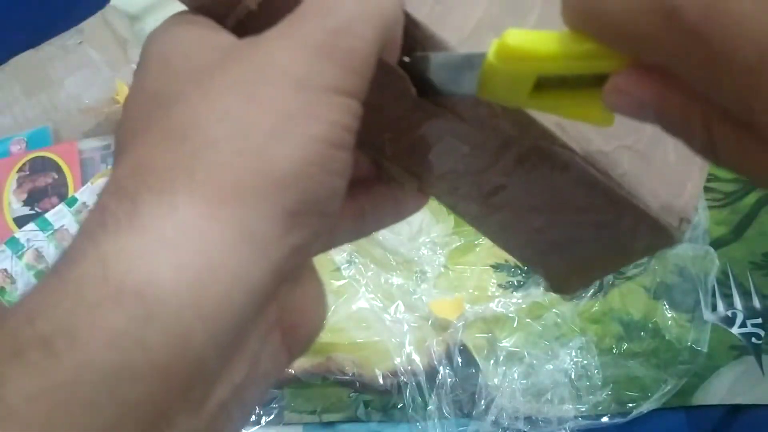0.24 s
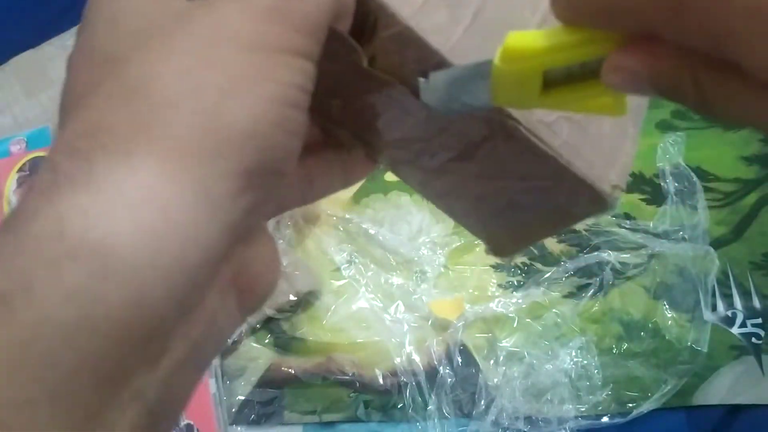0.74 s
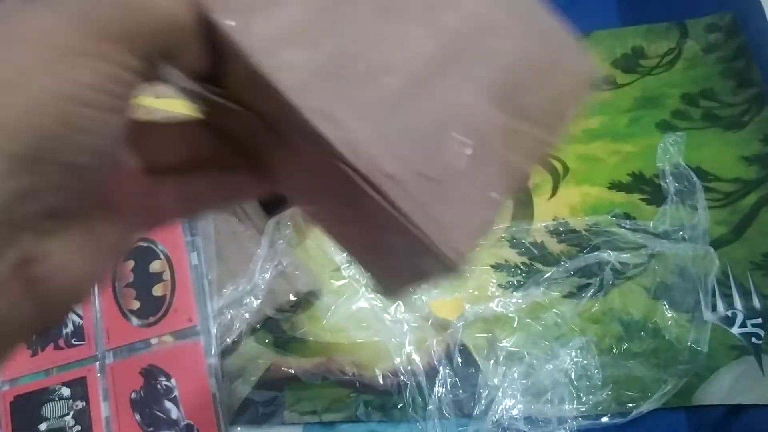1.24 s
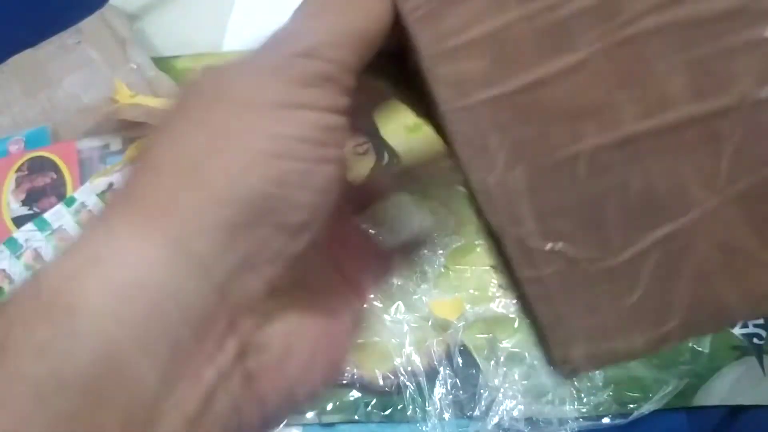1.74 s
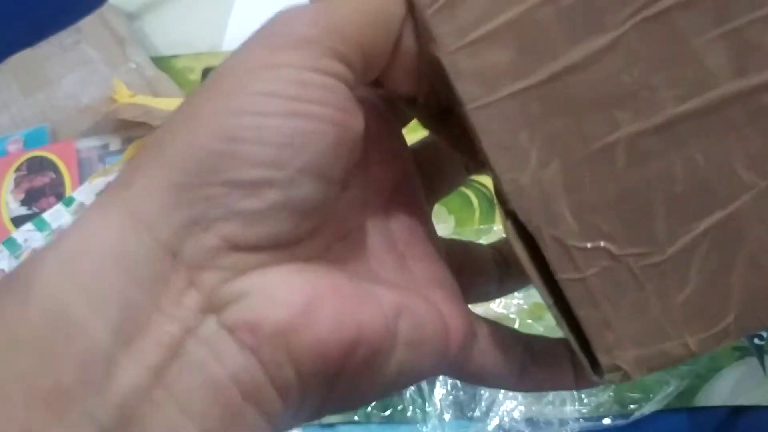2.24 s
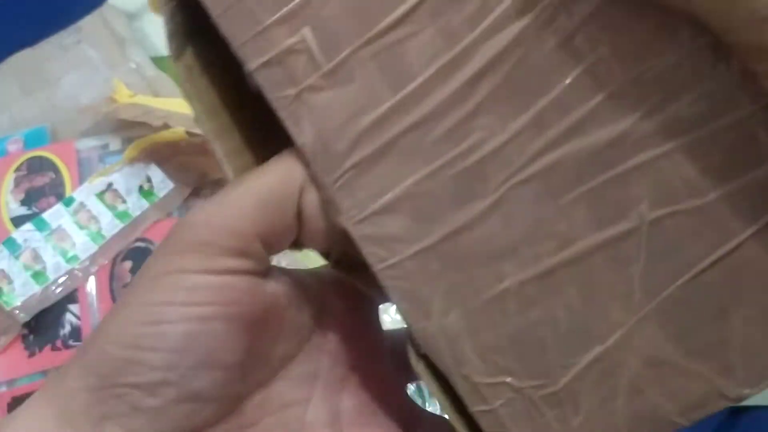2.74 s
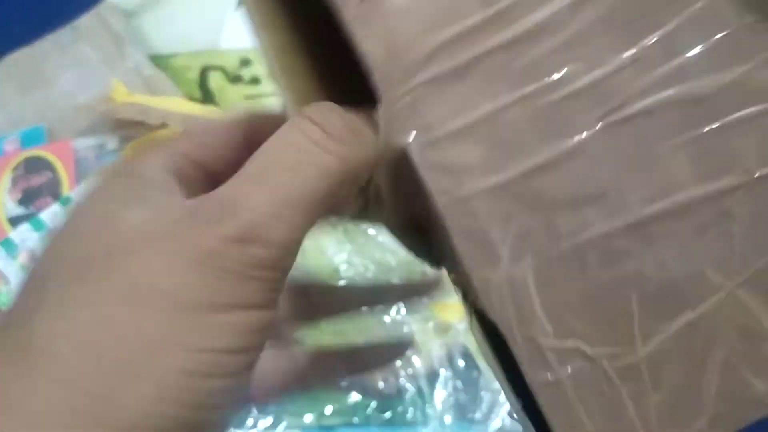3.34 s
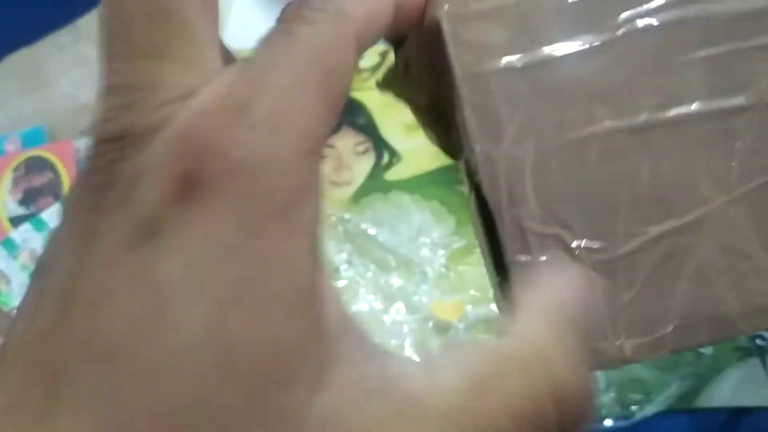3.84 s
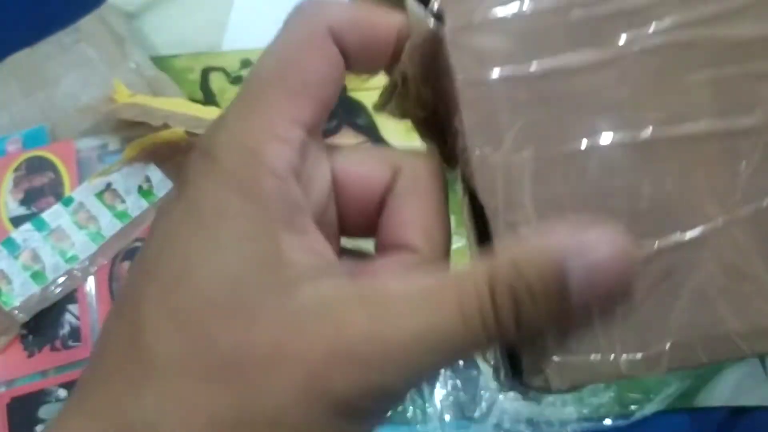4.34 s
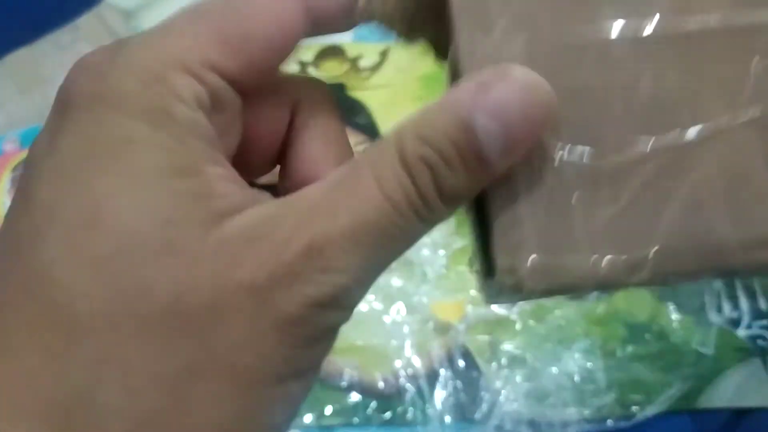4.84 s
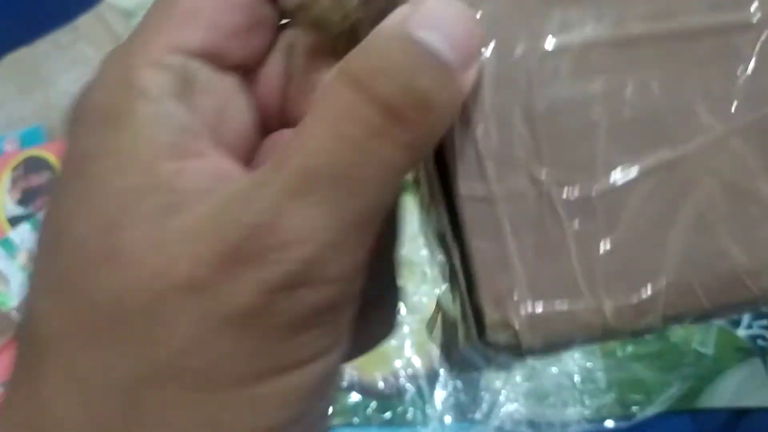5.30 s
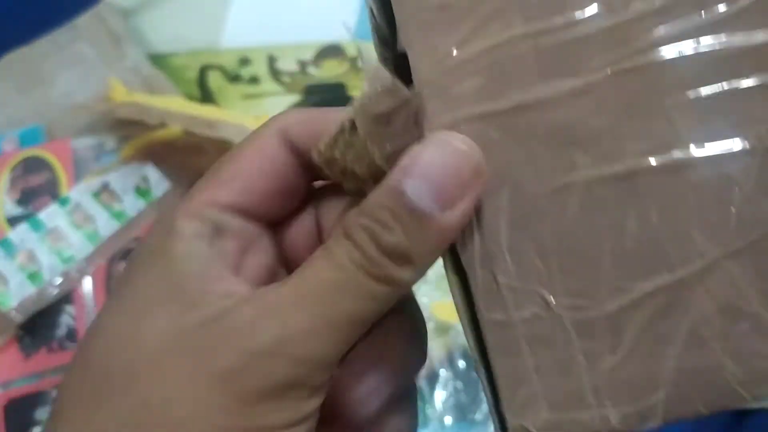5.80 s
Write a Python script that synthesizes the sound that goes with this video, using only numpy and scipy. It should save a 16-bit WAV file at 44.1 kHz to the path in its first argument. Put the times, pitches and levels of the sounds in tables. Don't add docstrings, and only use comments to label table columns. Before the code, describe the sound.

Indoors, with a soft low fan hum and light hiss, a small hollow box is worked on right beside the microphone. Gritty blade strokes crackle first, then fingers thud, rub and tap. Two bursts of bright tape snapping follow, separated by quiet handling; later a big sharp tear jolts the box, and thin creasing ticks, a short peel and a soft low set-down bump finish it.

```python
import sys
import numpy as np
from scipy import signal
from scipy.io import wavfile
from scipy.ndimage import uniform_filter1d

SR = 44100
rng = np.random.default_rng(int(sys.argv[2]) if len(sys.argv) > 2 else 0)


def to_wav(sig):
    pcm = np.clip(np.atleast_2d(sig), -1, 1) * 32767
    pcm = np.round(pcm).astype(np.int16)
    wavfile.write(sys.argv[1], SR, pcm.T)


def level_to_linear(level):
    exponent = np.asarray(level, float) / 20
    return 10 ** exponent


N = 267475

# frequency in Hz, density in dB per Hz.
AIR_SPECTRUM = [(15, -79), (25, 3.5), (90, -1), (238, -13), (358, -15.5), (457, -11), (524, -16.5),
                (726, -14), (902, -21.5), (1980, -25.5), (7300, -26.5), (15800, -33.5), (16200, -60)]
# frequency in Hz, left-right correlation (0 to 1).
AIR_LIKENESS = [(60, 0.51), (300, 0.87), (900, 0.21), (3000, 0.16), (15000, 0.092)]
# time in seconds, pitch in Hz, level in dB.
FAN_HUM = [(0.0, 97, -61), (0.91, 95.4, -63.5), (1.06, 94.9, -65.5), (1.23, 88, -60.5), (1.38, 94, -65),
           (1.6, 93.4, -64.5), (1.75, 92.5, -56.5), (2.15, 92, -54.5), (2.65, 91, -66), (3.11, 89.4, -62),
           (3.2, 89.6, -54), (3.7, 89.1, -62), (4.14, 93.5, -63), (4.85, 93.5, -57.5), (5.35, 93, -54),
           (5.6, 92, -58.5), (5.89, 91, -52), (6.07, 92, -63)]
# frequency in Hz, time to fall 60 dB in seconds.
ROOM_DECAY = [(100, 0.19), (1000, 0.3), (5000, 0.3), (15000, 0.17)]
# time in seconds, left over right in dB.
HAND_PLACE = [(0.0, 3), (0.27, 0.5), (5.47, -1), (6.07, -1)]
# frequency in Hz, bandwidth in Hz, level in dB.
BOX_MODES = [(190, 105, -5.5), (294, 180, -1.5), (430, 129, -2.5), (616, 142, -0.5), (826, 154, -0.5),
             (1193, 206, 0.5), (1211, 84, -6), (1484, 170, -7), (2080, 1500, -23)]
# start in seconds, peak in dB, pitch in Hz.
BUMPS = [
    (0.364, -40, 96),
    (0.536, -44, 110),
    (0.907, -40, 83.4),
    (1.649, -25, 118),
    (1.887, -44, 112),
    (4.663, -45, 94),
    (5.961, -33.5, 59.2),
]
# peak time in seconds, peak in dB, pitch in Hz.
FINGER_TAPS = [(0.517, -44, 840), (1.2415, -42.5, 280), (1.5418, -36, 364), (1.665, -29, 173),
               (1.801, -37.5, 594), (2.354, -42, 523), (2.8149, -37.5, 1290), (2.824, -39, 810),
               (2.9177, -41, 800), (3.027, -45, 960), (3.4712, -36, 512), (3.7407, -36.5, 335),
               (3.8462, -45, 536), (3.942, -42, 526), (4.151, -38, 308), (4.179, -35, 322),
               (4.204, -42, 300), (4.3516, -32.5, 430), (4.8372, -43.5, 775), (4.9278, -43, 744),
               (5.1022, -43.5, 760), (5.2246, -48, 730), (5.387, -42.5, 756), (5.654, -42.5, 290),
               (5.9489, -56, 548), (5.959, -51, 990)]
# peak time in seconds, peak in dB, pitch in Hz, push length in ms.
BOX_KNOCKS = [(0.1466, -44, 1130, 2.8), (0.1626, -44, 1560, 0.88), (0.333, -50, 1320, 2),
              (0.3565, -33, 820, 2.54), (0.5356, -34.5, 1219, 4.16), (0.7023, -56, 800, 5.5),
              (0.8905, -24.5, 1190, 2.1), (0.9, -24, 450, 2.95), (0.919, -28, 771.3, 2.2),
              (0.928, -35.5, 660, 1.2), (1.5257, -43, 700, 3.1), (1.657, -19.5, 190, 2.1),
              (1.884, -28.5, 190, 2.2), (2.1464, -43, 1270, 2.9), (2.2818, -27, 763, 2.07),
              (2.3043, -36.5, 760, 4.5), (2.7015, -49, 738, 2.5), (2.8719, -32.5, 764.2, 3.76),
              (3.0977, -43, 440, 1.4), (3.643, -29, 430, 1.94), (3.8732, -34, 500, 1.5),
              (4.1143, -33, 382, 0.9), (4.6116, -48.5, 1360, 2.2), (4.6625, -16.5, 1090, 1.44),
              (4.6634, -20, 630, 1.89), (4.6668, -11, 343, 1.96), (4.6779, -45, 332, 6.7),
              (5.5119, -49.5, 1190, 0.83), (5.84, -45.5, 420, 1.5), (5.9712, -58, 640, 4.3),
              (6.0089, -33.5, 1010, 1.2)]
# frequency in Hz, density in dB per Hz.
TAPE_SPECTRUM = [(2500, -35.5), (3400, -23.5), (4200, -5), (5000, -7), (6500, -3), (8000, -4), (9500, -2),
                 (11500, -3), (14000, -10), (15800, -6), (16300, -51)]
# frequency in Hz, density in dB per Hz.
SCRATCH_SPECTRUM = [(800, -17.5), (1500, -6), (2100, -5.5), (2900, -7), (4200, -5), (5500, -8.5),
                    (8000, -20)]
# frequency in Hz, density in dB per Hz.
SNAP_SPECTRUM = [(2500, -18.5), (4500, -0.5), (8000, -3), (12000, -2), (16000, -12.5), (18000, -28.5)]
# peak time in seconds, tape crackle in dB, build in seconds,
# fade in seconds, brightness of tape over box in dB.
SAW_STROKES = [
    (0.01, -62, 0.086, 0.23, 2.5),
    (0.146, -40, 0.0048, 0.024, 24),
    (0.239, -41, 0.032, 0.04, 8.5),
    (0.358, -41, 0.033, 0.063, 6.5),
    (0.54, -33.5, 0.031, 0.019, 6),
    (0.7, -38.5, 0.072, 0.051, 8),
    (0.89, -39.5, 0.01, 0.045, -12),
    (0.94, -70, .005, 0.14, -5),
]
# peak time in seconds, tape crackle in dB, build in seconds,
# fade in seconds, brightness of tape over box in dB.
HAND_SQUEEZES = [(1.229, -62, 0.0079, 0.069, -10.5), (1.371, -58.5, 0.098, 0.099, -0.5),
                 (1.527, -50, 0.008, 0.018, -23), (1.802, -49.5, 0.091, 0.051, -6),
                 (1.866, -60, 0.0073, 0.14, -7), (2.04, -47.5, 0.098, .01, -1.5),
                 (2.79, -60.5, 0.6, 0.041, -12), (1.73, -62, 0.083, 0.2, -3),
                 (3.36, -45, 0.091, 0.092, -1.5), (3.452, -53.5, 0.17, 0.19, -5.5),
                 (3.843, -59.5, 0.0058, 0.042, -17.5), (3.932, -60, 0.0064, 0.13, -14),
                 (4.184, -51, 0.028, 0.055, -10.5), (4.359, -53, 0.13, 0.18, -7),
                 (4.656, -42.5, 0.17, 0.11, 6.5), (4.92, -50.5, 0.056, 0.055, -8),
                 (5.122, -58.5, 0.13, 0.01, -12.5), (5.212, -55, 0.0075, 0.084, -2.5),
                 (5.403, -41, 0.11, 0.012, 3), (5.63, -45, 0.095, 0.048, 3), (5.83, -63, 0.16, 0.26, 5),
                 (5.956, -39.5, 0.041, 0.075, -5), (3.26, -56, 0.21, 0.049, -4)]
# start in seconds, length in seconds, tape crackle in dB,
# swell from start to end in dB, brightness of tape over box in dB.
STEADY_PULLS = [(0.68, 0.051, -39.5, -3.5, 1), (0.87, 0.048, -34.5, 7.5, -0.5), (1.552, 0.15, -57, -9, 4.5),
                (2.042, 0.14, -46, -8, 6), (2.145, 0.13, -39.5, 8, 10.5), (2.277, 0.089, -34.5, -5, 8),
                (2.367, 0.12, -59, 4, -2), (2.506, 0.1, -55.5, -7.5, -5), (2.803, 0.141, -35.5, 2.5, 13),
                (3.634, 0.1124, -53.5, 14.5, -4), (2.987, 0.12, -57.5, -6, -11.5),
                (4.112, 0.073, -66.5, 5, -21.5), (4.789, 0.16, -56, -2.5, -6.5), (5.396, 0.25, -48, 6, 15),
                (5, .05, -58, 7, 7), (4.576, 0.017, -43.5, -3, 7), (4.608, 0.043, -41.5, -13, 12),
                (4.13, 0.093, -61.5, 2, -14.5), (4.2, 0.037, -49, -2, 10)]
# peak time in seconds, peak in dB, burst length in ms.
BLADE_CUTS = [(0.0527, -44, 0.57), (0.071, -43.5, 0.7), (0.126, -45, 1.6), (0.147, -24, 0.15),
              (0.163, -32, 0.53), (0.214, -31.5, 0.58), (0.218, -30, 0.76), (0.2374, -31, 0.99),
              (0.255, -36, 1.2), (0.271, -39, 1.1), (0.3332, -35.5, 0.74), (0.3552, -19.5, 1.78),
              (0.4996, -39, 0.53), (0.5147, -25.5, 1), (0.5352, -20.5, 3.5), (.8456, -50, .7),
              (0.8694, -42, 0.65), (0.8868, -22, 1.3), (0.891, -19, 1.13), (0.918, -29, 2.3),
              (0.9267, -18.5, 0.99), (1.066, -54, 0.82), (3.845, -50, 0.34), (6.008, -39, 0.51)]
# peak time in seconds, peak in dB, pitch
# in Hz.
EARLY_TICKS = [(0.0603, -45, 11400), (0.0785, -46, 10400), (0.1112, -43, 10000), (0.121, -41, 10400),
               (0.143, -39, 10200), (0.151, -15.5, 10200), (0.159, -29, 10500), (0.2318, -28, 10800),
               (0.343, -41, 8100), (0.4779, -47, 8100), (0.6583, -40, 10400), (0.7283, -22.5, 7200),
               (1.1322, -46, 7460), (1.2297, -55, 5872), (1.2389, -35.5, 4330), (1.2993, -51, 6500),
               (1.332, -45, 6260), (1.363, -48, 5900), (1.3765, -33, 5940), (1.387, -44, 6150),
               (1.401, -41, 6860), (1.4229, -49, 6900), (1.4489, -53, 8200), (1.4935, -48, 6900),
               (1.5304, -37, 5600), (1.5772, -36, 7100), (1.5835, -37, 7340), (1.601, -36, 7140),
               (1.6127, -31, 7740), (1.623, -45, 9300), (1.627, -38, 7400), (1.654, -40, 7860),
               (1.6683, -43, 7400), (1.6808, -41, 7000), (1.771, -45, 6700), (2.0009, -40, 6900),
               (2.0078, -38, 9800), (2.0298, -33, 9200), (2.0475, -29, 9300), (2.105, -27.5, 9100),
               (2.1187, -24.5, 8100), (2.1317, -27, 9200), (2.1505, -26, 8550), (2.1752, -25, 8700),
               (2.18, -21, 9300), (2.1876, -27, 8900), (2.1989, -30, 11200), (2.219, -22.5, 8300),
               (2.3398, -26, 8100), (2.4653, -44, 9432), (2.7952, -34, 9100), (2.8017, -37, 7900),
               (2.8256, -19, 9600), (2.894, -20, 8300), (2.918, -33, 7750), (2.996, -38, 9000),
               (3.0208, -49, 9800), (3.1519, -46, 9850)]
# peak time in seconds, peak in dB, pitch in Hz.
LATE_TICKS = [(3.1841, -52, 8200), (3.2386, -41, 9300), (3.2549, -49, 8200), (3.28, -49, 8000),
              (3.6089, -47, 6790), (3.6348, -49, 5560), (3.6413, -46, 7500), (3.6808, -36, 6770),
              (3.7224, -31, 6300), (3.8724, -40.5, 5620), (4.08, -51, 7700), (4.2935, -33, 11300),
              (4.3168, -31, 9000), (4.3253, -35, 9700), (4.3344, -32, 9700), (4.3542, -29, 12100),
              (4.4026, -34, 11500), (4.4326, -41, 7800), (4.4426, -39, 12500), (4.4598, -41, 10000),
              (4.4961, -42, 9700), (4.5128, -41, 9000), (4.519, -34, 11000), (4.537, -35, 8400),
              (4.5572, -35, 9900), (4.5618, -40, 9400), (4.5787, -24, 11200), (4.6334, -30, 10200),
              (4.813, -39, 8800), (4.8353, -33, 8400), (5.0695, -30, 9800), (5.0923, -37, 7400),
              (5.1174, -30, 8650), (5.1239, -43, 9100), (5.1281, -40, 7800), (5.212, -50, 7700),
              (5.2187, -45, 7800), (5.2252, -37, 7800), (5.234, -35, 11200), (5.251, -38, 7800),
              (5.301, -52, 10200), (5.3198, -37, 8200), (5.3556, -24.5, 8560), (5.4162, -32, 8500),
              (5.4329, -34, 9100), (5.5061, -32.5, 8450), (5.541, -38, 8540), (5.5617, -33.5, 8250),
              (5.5746, -30, 8200), (5.5878, -36, 8360), (5.5999, -26.5, 8200), (5.632, -35, 8700),
              (5.7095, -33.5, 9100), (5.7923, -47, 9730), (5.839, -42, 9100), (5.8511, -47, 9400),
              (5.9556, -26.5, 6000), (5.9848, -31, 5600)]
# peak time in seconds, peak in dB, scratch relative to the snap in dB,
# burst length in ms, pitch in Hz.
TAPE_SNAPS = [(1.5256, -42.5, 12, 0.4, 5600), (1.594, -28, -7, 0.44, 6870),
              (2.0436, -19, -23.5, 0.41, 9500), (2.0513, -30, -10, .8, 9000), (2.06, -18, -17, 0.56, 9500),
              (2.0755, -21, -13, 0.43, 10000), (2.0816, -23.5, -17, 1.2, 9100),
              (2.1461, -18.5, -13, 0.31, 10500), (2.2808, -23, -3, 1.94, 9950),
              (2.3045, -10, -15, 0.25, 9300), (2.7001, -37, 2, 0.41, 7000), (2.807, -42, -18, 2.1, 9000),
              (2.8139, -18.5, -20, 0.54, 9000), (2.8422, -18, -21, 0.96, 9200),
              (2.8653, -16, -13, 0.5, 8500), (2.8709, -16, -14, 2.68, 8070),
              (2.8996, -20.5, -17, 0.46, 9030), (2.9891, -35.5, -7, 1.13, 8000),
              (4.3482, -14, -18, 0.46, 8600), (4.392, -35, -17, 1.1, 9800), (4.4843, -33, -7.5, 0.91, 9300),
              (4.6083, -24, -17.5, 1.1, 10000), (4.6513, -23.5, -23, 2.6, 9000), (4.66, -18, -24, 3, 8300),
              (4.6624, -7, -14, 1.2, 8000), (4.6638, -12, -4, 0.65, 10300), (5.337, -36.5, -10, 0.7, 8550),
              (5.397, -26.5, -15, 0.68, 8990), (5.511, -27, -9, 0.33, 6550),
              (5.5951, -23.5, -13.5, .6, 8500)]

BLADE_SCRATCH_DB, HAND_SCRATCH_DB, PEEL_SCRATCH_DB = 1, -4, -7


def evened(x):
    return x / np.sqrt(np.mean(x ** 2) + 1e-20)


def read(points, hz):
    f, value = np.transpose(points)
    return np.interp(np.log(hz + 1), np.log(f + 1), value)


def curve(rows, axis):
    rows = np.array(rows)
    return np.interp(np.arange(N) / SR, rows[:, 0], rows[:, axis])


def add(mix, s, sound):
    part = mix[..., max(round(s * SR), 0):][..., :sound.shape[-1]]
    part += sound[..., :part.shape[-1]]


def colour(points):
    hz = abs(np.fft.fftfreq(4096, 1 / SR))
    log_gain = np.log(level_to_linear(np.maximum(read(points, hz), -80)))
    taps = np.fft.ifft(np.exp(log_gain - 1j * signal.hilbert(log_gain).imag)).real[:1024]
    return taps / np.linalg.norm(taps)


def swelling(t, rise):
    return t / rise * np.exp(1 - t / rise)


def panned(pan_db):
    return level_to_linear(np.array([pan_db / 2, -pan_db / 2]))


def air():
    frames, hz = N // 512 + 5, np.fft.rfftfreq(2048, 1 / SR)
    a, b, c, d, patches = rng.standard_normal((frames, 1025, 5)).T
    patches = evened(uniform_filter1d(uniform_filter1d(patches, 20, 0), 8, 1))
    same = read(AIR_LIKENESS, hz)[:, None]
    left = a + 1j * b
    right = same * left + np.sqrt(1 - same ** 2) * (c + 1j * d)
    z = np.array([left, right]) * level_to_linear(read(AIR_SPECTRUM, hz)[:, None] + 2.06 * patches)
    return level_to_linear(-59.5) * evened(signal.istft(z, nperseg=2048, noverlap=1536)[1][:, :N])


def hum():
    waver = evened(uniform_filter1d(uniform_filter1d(rng.standard_normal(N), 2600), 2600))
    phase = 2 * np.pi * np.cumsum(curve(FAN_HUM, axis=1)) / SR
    return np.sqrt(2) * level_to_linear(curve(FAN_HUM, axis=2) + 2.4 * waver) * np.sin(phase)


def room_tail():
    taps = rng.choice([-1., 1.], (2, SR // 2)) * (rng.random((2, SR // 2)) < .05)
    taps[:, :300] = 0
    hz, t, z = signal.stft(taps, SR, nperseg=256)
    tail = signal.istft(z * level_to_linear(-60 * t / read(ROOM_DECAY, hz)[:, None]), SR, nperseg=256)[1]
    return tail / np.linalg.norm(tail[0])


def near_paths(count):
    near = rng.standard_normal((count, 2, 300)) * (rng.random((count, 2, 300)) < .4)
    near *= level_to_linear(-60 * np.arange(300) / SR / .008)
    near = signal.lfilter(*signal.butter(2, 2300, "high", fs=SR), near)
    paths = level_to_linear(-1.5) * near / np.linalg.norm(near, axis=2)[..., None]
    lag = 6
    paths[np.arange(count), 0, lag + np.arange(count) % 2] += 1
    paths[:, 1, 0] += 1
    return paths


def space(x, count=14):
    out = level_to_linear(-12) * signal.fftconvolve(x[None], room_tail(), axes=1)[:, :N]
    spot = np.repeat(rng.integers(0, count, N // 500 + 1), 500)[:N]
    for k, path in enumerate(near_paths(count)):
        share = np.sqrt(abs(uniform_filter1d(1. * (spot == k), 200)))
        out += signal.oaconvolve((x * share)[None], path, axes=1)[:, :N]
    return out * panned(curve(HAND_PLACE, axis=1))


def box_ring():
    t = np.arange(1500) / SR
    ring = np.zeros(1500)
    for k, (hz, width, db) in enumerate(BOX_MODES):
        ring += level_to_linear(db) * (-1) ** k * np.exp(-np.pi * width * t) * np.sin(2 * np.pi * hz * t)
    return ring / np.linalg.norm(ring)


def bumps():
    out, t = np.zeros(N), np.arange(2000) / SR
    for s, db, hz in BUMPS:
        add(out, s, level_to_linear(db - 2.0) * swelling(t, 0.45 / hz) * np.sin(2 * np.pi * hz * t))
    return out


def knocks():
    out, t, ring = np.zeros(N), np.arange(2000) / SR, box_ring()
    rows = BOX_KNOCKS + [(*row, 3.49) for row in FINGER_TAPS]
    for (s, db, hz, ms), noise in zip(rows, rng.standard_normal((len(rows), 2000))):
        rise = ms * 0.884 / 1000
        push = swelling(t, rise) ** 2.87
        body = signal.fftconvolve(noise * push, ring)[:2000]
        hardness = np.clip(hz / 700, 0, 1) ** 2
        flex = push * np.cos(2 * np.pi * hz * (t - rise))
        flex -= push * flex.sum() / push.sum()
        hit = flex + 1.01 * hardness * body / abs(body).max()
        add(out, s - rise, level_to_linear(db - 2.0) * hit)
    return out


def grains(per_s, spread_db, clump_db, clump_ms):
    size = level_to_linear(spread_db * np.minimum(rng.exponential(1, N), 5)) * rng.choice([-1., 1.], N)
    width = max(int(clump_ms * SR / 1000), 2)
    clumps = evened(uniform_filter1d(uniform_filter1d(rng.standard_normal(N), width), width))
    slips = size * (rng.random(N) < per_s / SR) * level_to_linear(clump_db * clumps)
    return slips / np.sqrt(uniform_filter1d(slips ** 2, 3000) + 1e-9)


def layers(db, bright_db, scratch_db):
    return level_to_linear(db + np.array([[0], [scratch_db - 0.45 * bright_db], [-bright_db]])) ** 2


def strain():
    t = np.arange(0, N + 32, 32) / SR
    power = layers(-78 + 0 * t, -4.5, HAND_SCRATCH_DB)
    for rows, scratch_db in ((SAW_STROKES, BLADE_SCRATCH_DB), (HAND_SQUEEZES, HAND_SCRATCH_DB)):
        for s, db, build, fade, bright_db in rows:
            effort_db = db - 20 * np.maximum((s - t) / build, (t - s) / fade)
            power = power + layers(effort_db, bright_db, scratch_db)
    edge_s = 0.0019
    for s, length, db, swell_db, bright_db in STEADY_PULLS:
        scratch_db = BLADE_SCRATCH_DB if s < 1 else PEEL_SCRATCH_DB
        outside = np.maximum(np.maximum(s - t, t - s - length), 0)
        swell = swell_db * ((t - s) / length - .5).clip(-1, 1)
        power = power + layers(db + swell - 20 * outside / edge_s, bright_db, scratch_db)
    return [np.interp(np.arange(N) / SR, t, np.sqrt(p)) for p in power]


def tearing():
    tape = grains(8000, 1.0, 0.9, 1.4)
    paper = grains(5000, 0.77, 2.4, 2.0) + 0.78 * tape
    wall = grains(2500, 0.87, 3.8, 16.5) + 0.34 * paper
    crackle, scratch, rustle = strain()
    out = level_to_linear(-3.5) * signal.oaconvolve(tape * crackle, colour(TAPE_SPECTRUM))[:N]
    out += level_to_linear(-2.5) * signal.oaconvolve(paper * scratch, colour(SCRATCH_SPECTRUM))[:N]
    return out + level_to_linear(-7.5) * signal.oaconvolve(wall * rustle, box_ring())[:N]


def snaps():
    out, t = np.zeros(N), np.arange(700) / SR
    tape, scratch = colour(SNAP_SPECTRUM), colour(SCRATCH_SPECTRUM)
    rows = [(s, db, -6.5, ms, 9200) for s, db, ms in BLADE_CUTS] + TAPE_SNAPS
    rows += [(s, db, -24, 0.42, hz) for s, db, hz in EARLY_TICKS + LATE_TICKS]
    span = 1.324
    for (s, db, scratch_db, ms, hz), noise in zip(rows, rng.standard_normal((len(rows), 700))):
        rise = ms * .6 / 1000
        burst = noise * swelling(t, rise)
        burst[round(rise * SR)] = 3.4
        broad, dull = signal.fftconvolve(burst, tape), signal.fftconvolve(burst, scratch)
        band = signal.butter(2, [hz / span, min(hz * span, 16500)], "band", fs=SR)
        crack = signal.lfilter(*band, np.pad(burst, (0, 1023))) + level_to_linear(-11) * broad
        snap = crack / abs(crack).max() + level_to_linear(scratch_db + 5.5) * dull / abs(dull).max()
        add(out, s - rise, level_to_linear(db - 0.5) * snap)
    return out


def scene():
    parcel = tearing() + snaps() + knocks() + bumps()
    return space(parcel) + air() + hum() * panned(0.96)[:, None]


def gate(x, under_db=8.0, jump_db=3.0, dip_db=2.5, from_hz=2300):
    hz, t, z = signal.stft(x, SR, nperseg=1024)
    bands = (abs(z[:, :512].mean(0)) ** 2).reshape(64, 8, -1).mean(1)
    band_db = 10 * np.log10(uniform_filter1d(bands, size=3) + 1e-20)
    treble = hz[:512:8] > from_hz
    middle_db = np.median(band_db[8:44], axis=0)
    steady = middle_db < uniform_filter1d(middle_db, size=9) + jump_db
    around_db = uniform_filter1d(band_db, size=7, axis=0)
    low = (band_db < middle_db - under_db) | (band_db < around_db - dip_db)
    weak = low & treble[:, None] & steady
    z[:, :512] *= np.repeat(np.where(weak, .03, 1), 8, axis=0)
    return signal.istft(z, SR, nperseg=1024)[1][:, :N]


def low_pass(x):
    return signal.sosfilt(signal.butter(12, 16810, fs=SR, output="sos"), x)


def record(dry):
    bass_cut = signal.butter(3, 45, "high", fs=SR, output="sos")
    top_cut = signal.butter(12, 16300, fs=SR, output="sos")
    mix = signal.sosfiltfilt(top_cut, gate(signal.sosfilt(bass_cut, dry)))
    return low_pass(mix)


dry = scene()
out = record(dry)
to_wav(out)
```